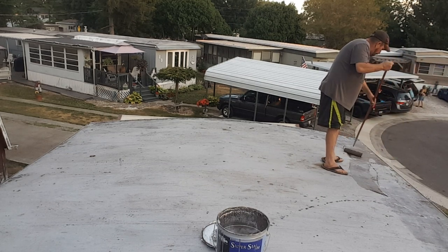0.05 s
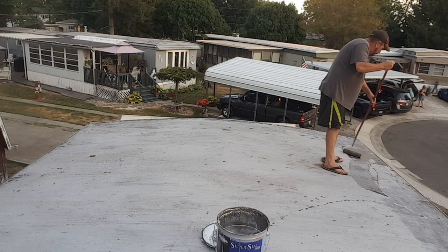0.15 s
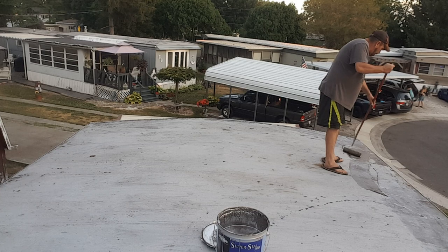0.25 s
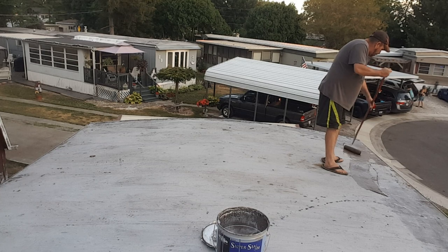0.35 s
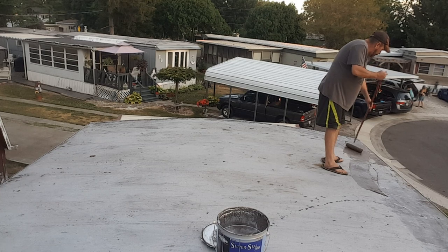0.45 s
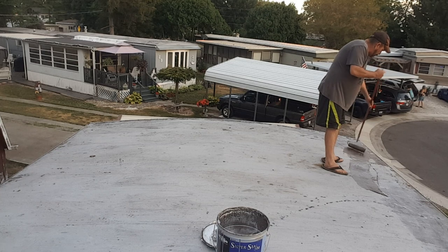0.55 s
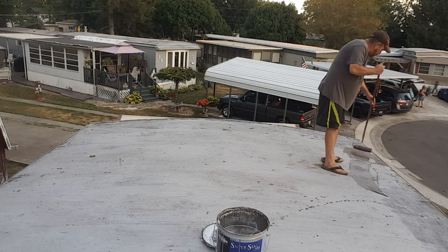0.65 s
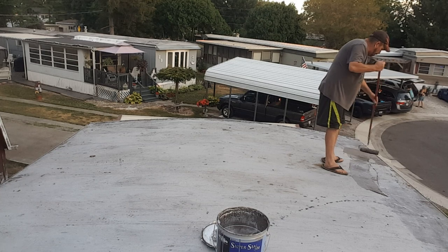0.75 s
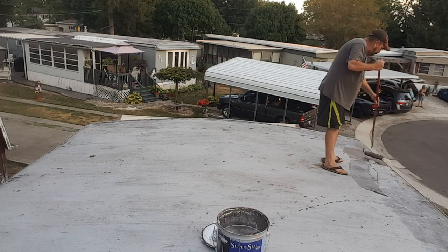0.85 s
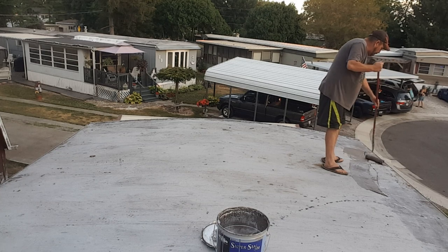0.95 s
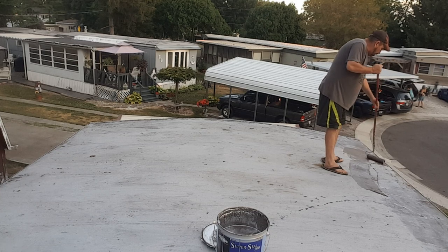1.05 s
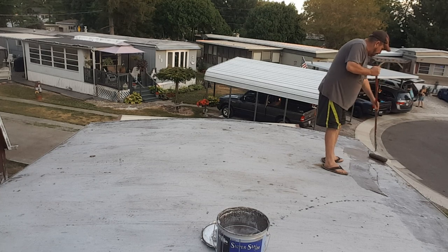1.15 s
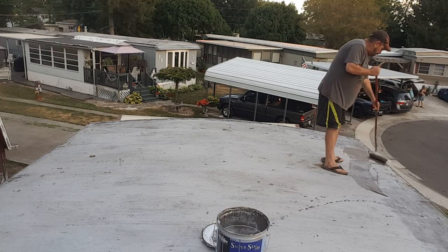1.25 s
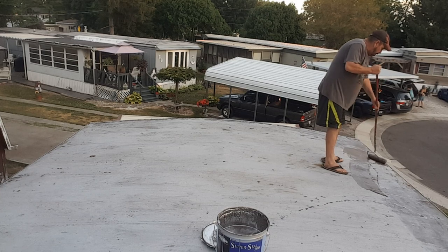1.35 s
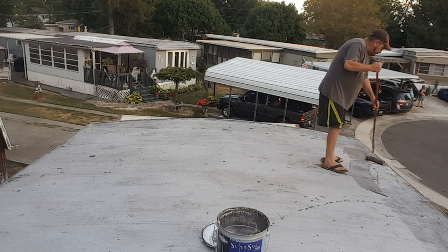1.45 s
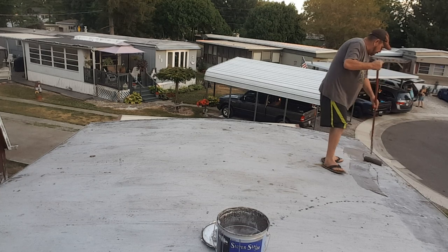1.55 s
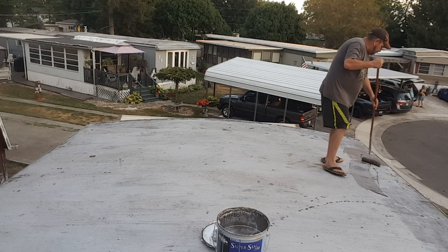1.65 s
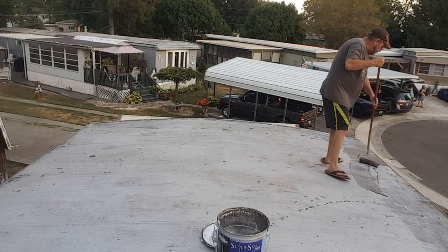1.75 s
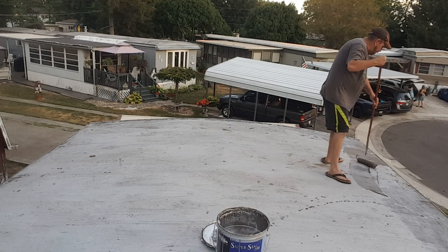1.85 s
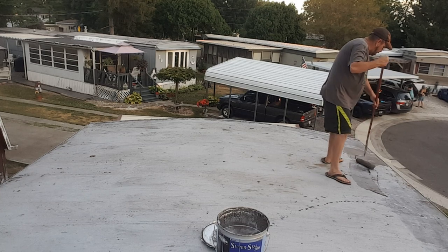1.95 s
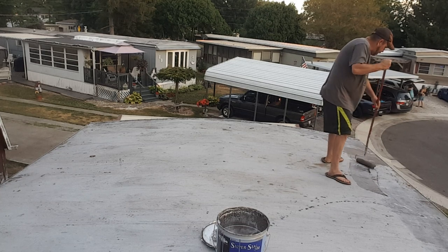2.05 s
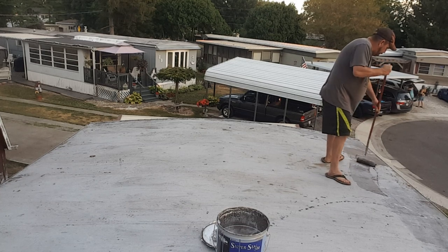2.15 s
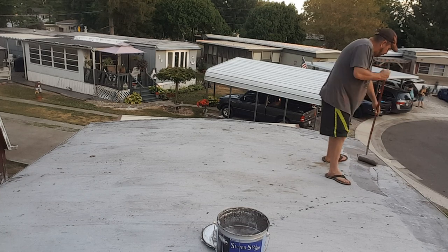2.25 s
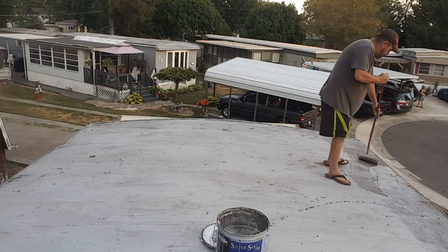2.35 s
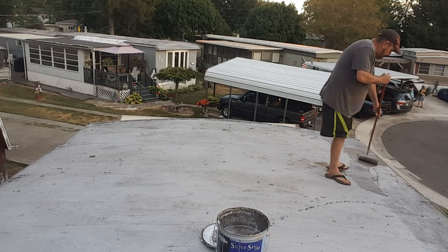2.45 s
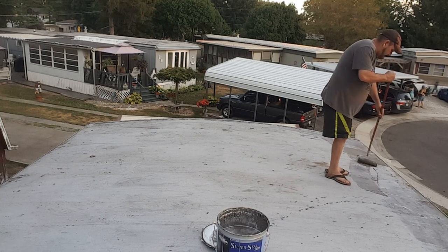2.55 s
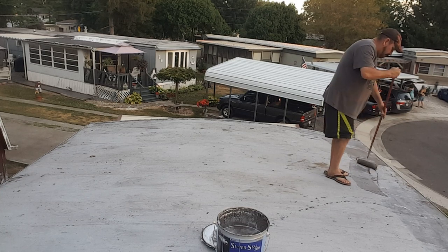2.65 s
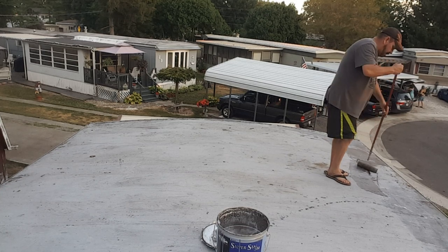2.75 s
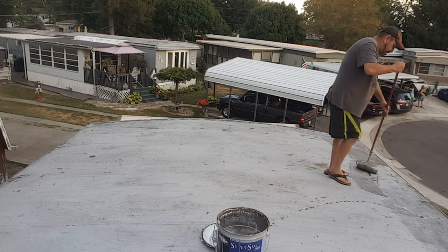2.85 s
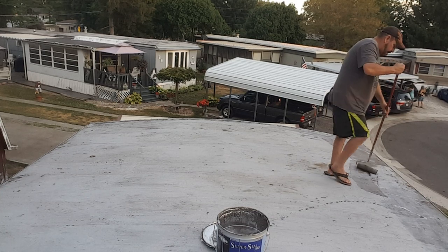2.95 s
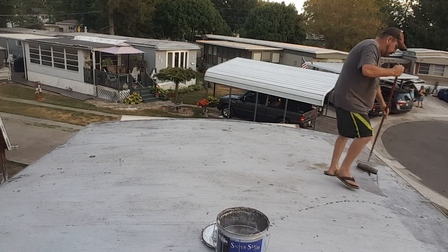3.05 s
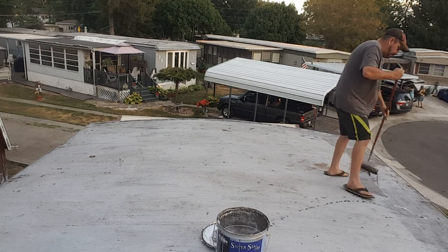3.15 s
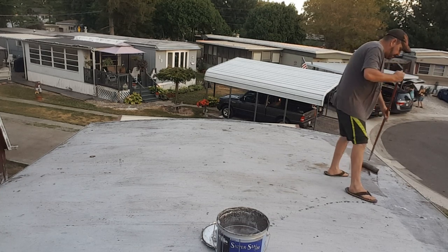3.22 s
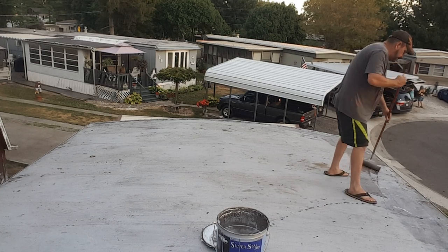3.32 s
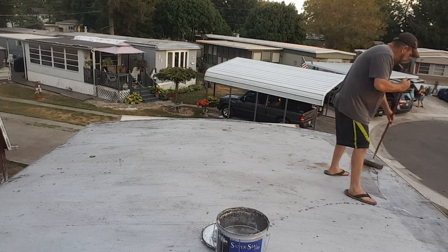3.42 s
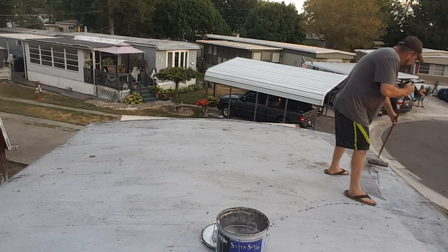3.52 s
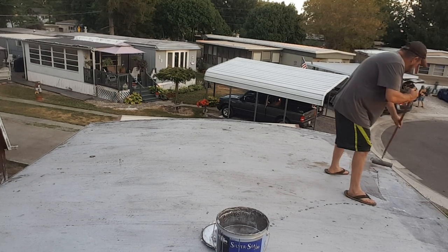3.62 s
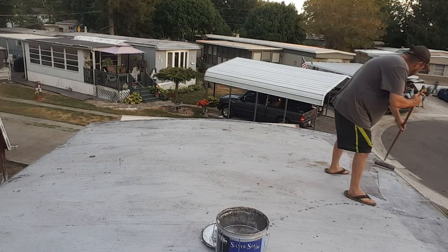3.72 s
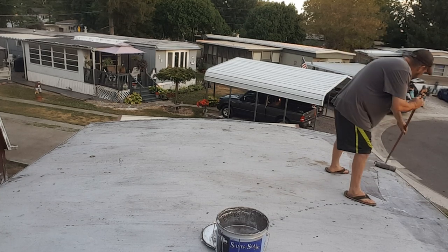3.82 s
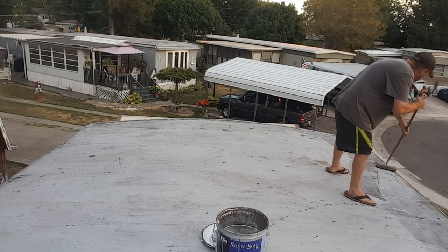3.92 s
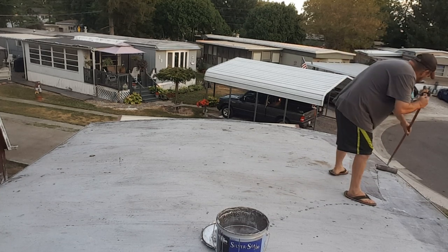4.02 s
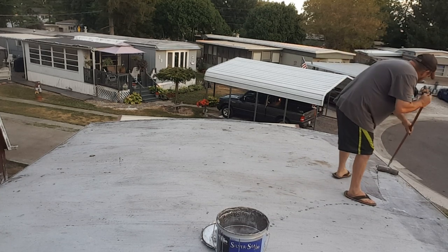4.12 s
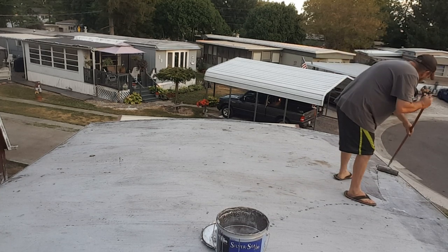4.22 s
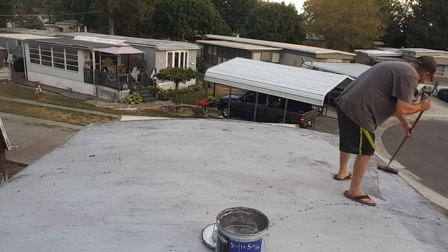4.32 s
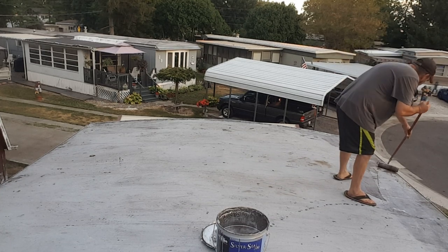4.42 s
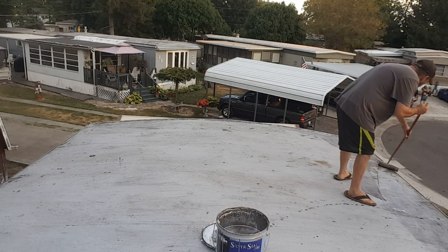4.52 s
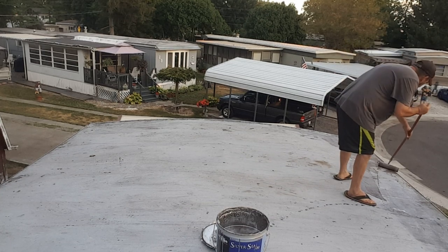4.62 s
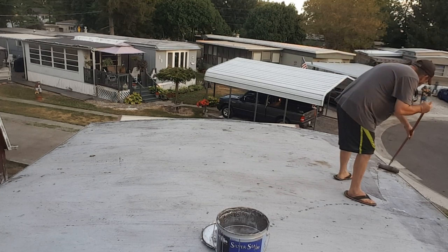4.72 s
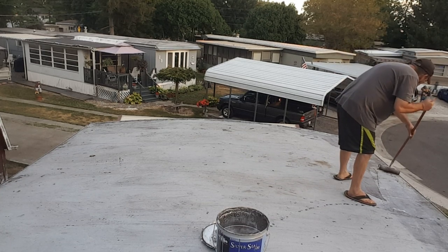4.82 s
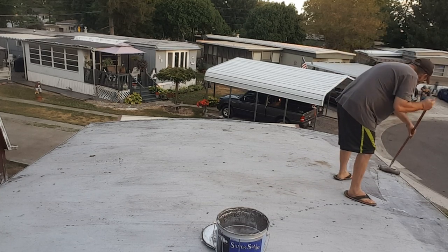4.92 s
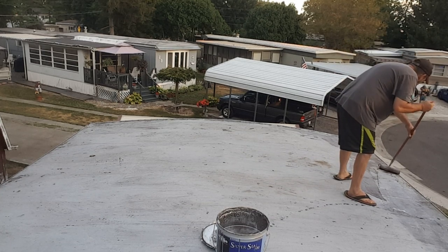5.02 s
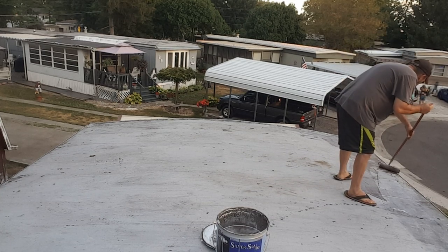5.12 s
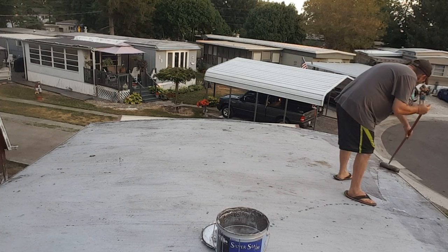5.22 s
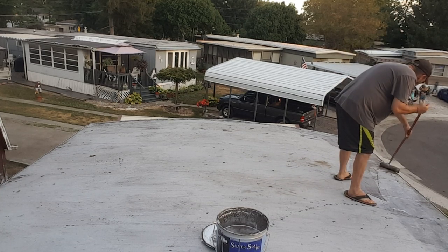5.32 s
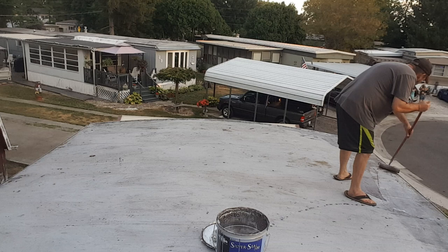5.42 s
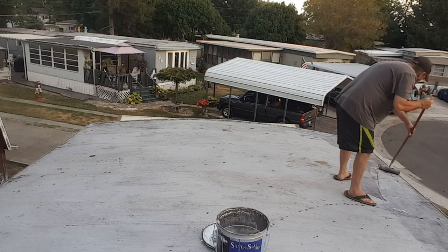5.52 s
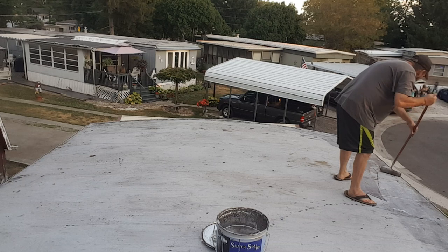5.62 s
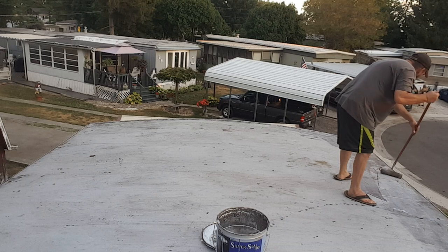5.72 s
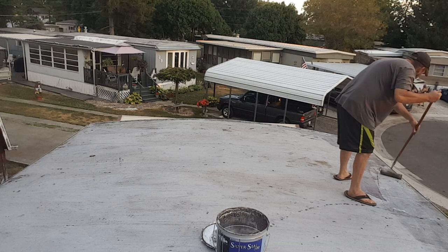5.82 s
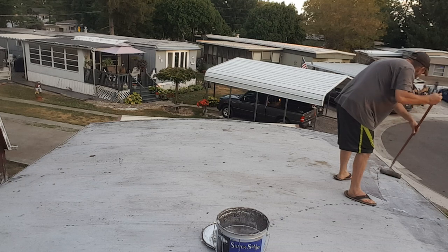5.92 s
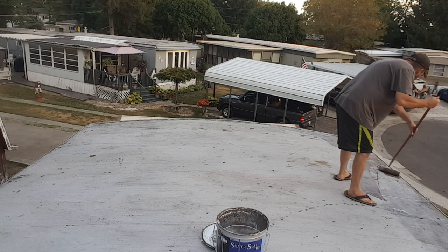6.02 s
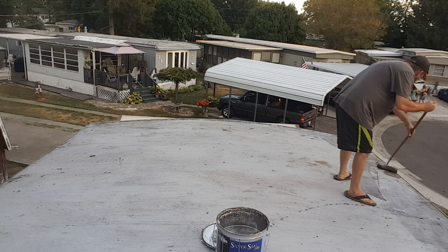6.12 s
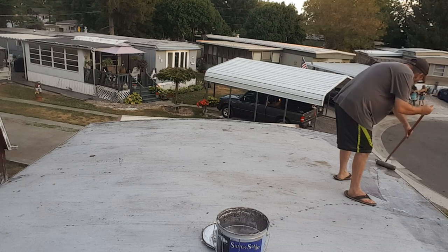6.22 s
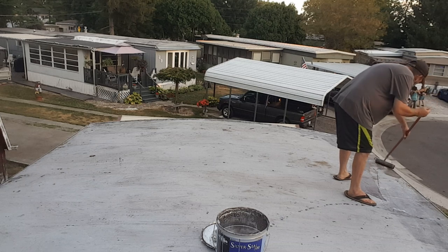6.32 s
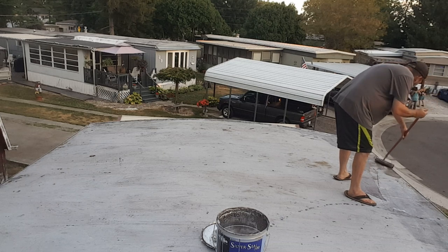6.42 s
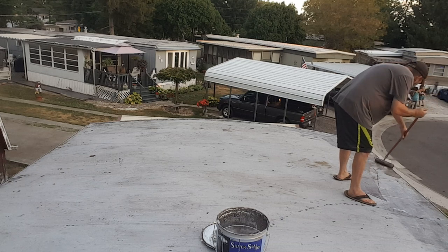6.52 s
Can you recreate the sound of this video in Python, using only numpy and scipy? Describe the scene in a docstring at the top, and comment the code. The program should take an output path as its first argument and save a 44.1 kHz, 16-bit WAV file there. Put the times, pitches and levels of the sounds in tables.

```python
"""On a hollow sheet-metal roof over a quiet street, a few metres off, a man in sandals rolls on coating.
The panels buckle under his feet and the roller: each load sets off a run of snaps that rings the sheet,
loudest as he steps sideways. In between, the roller and his shifting weight keep up a soft rumble.
Sandals and the wet roller swish and peel softly; far traffic and a machine hum lie behind."""
import sys
import numpy as np
from scipy import signal
from scipy.fft import rfft, irfft, next_fast_len
from scipy.io import wavfile
from scipy.ndimage import uniform_filter1d, map_coordinates

SR = 44100
rng = np.random.default_rng(int(sys.argv[2]) if len(sys.argv) > 2 else 0)


def to_wav(s):
    """Save 16-bit WAV."""
    ch = np.atleast_2d(s).T  # columns
    pcm = np.round(np.clip(ch, -1, 1) * 32767)  # PCM
    wavfile.write(sys.argv[1], SR, pcm.astype(np.int16))


N = 289737


def amp(db):
    """Decibels to gain."""
    return 10 ** (np.asarray(db) / 20)


def unit(x):
    """x at rms 1."""
    return x / np.sqrt(np.mean(x ** 2) + 1e-20)


def along(points, hz):
    """Read a curve of (frequency, value) points on a log frequency axis."""
    f, v = np.transpose(points)
    return np.interp(np.log(hz + 1), np.log(f + 1), v)


def wobble(rate):
    """A smooth random modulator, rate knots a second."""
    knots = rng.standard_normal(int(N * rate / SR) + 4)
    return map_coordinates(knots, [np.arange(N) * rate / SR])


def filtered(x, response):
    """EQ x with a complex response, a function of frequency."""
    size = x.shape[-1]
    padded = next_fast_len(size + SR // 10)
    spectrum = rfft(x, padded) * response(np.fft.rfftfreq(padded, 1 / SR))
    return irfft(spectrum, padded)[..., :size]


def minimum_phase(gain):
    """A response with this gain and no pre-ring: nothing sounds before the blow."""
    cepstrum = irfft(np.log(np.maximum(gain, 1e-6)))
    half = len(cepstrum) // 2
    cepstrum[1:half] *= 2
    cepstrum[half + 1:] = 0
    return np.exp(rfft(cepstrum))


def noise_pair(correlation, size):
    """Stereo white noise whose width follows a curve of left-right correlation."""
    def mid_side_gains(hz):
        angle = np.arccos(np.clip(along(correlation, hz), -1, 1)) / 2
        return np.array([np.cos(angle), np.sin(angle)])
    mid, side = filtered(rng.standard_normal((2, size)), mid_side_gains)
    return np.array([mid + side, mid - side])


def add(track, s, sound):
    """Mix a sound into the track at s seconds."""
    part = track[:, round(s * SR):][:, :sound.shape[-1]]
    part += sound[..., :part.shape[-1]]


# EQ of the street bed: f/Hz, relative level/dB
STREET_EQ = [(15, -22.5), (25, -22), (93, -3), (150, -7.5), (220, -7.5), (340, -11.5), (430, -11.5),
             (950, -12.5), (1300, -18), (2000, -21.5), (3200, -27.5), (5000, -34.5), (8500, -38.5),
             (15500, -44)]
# stereo image of the bed: f/Hz, left-right correlation
STREET_IMAGE = [(60, 0.98), (130, 0.9), (290, 0.8), (640, 0.026), (1410, -0.85), (3100, 0.15),
                (6800, -0.11)]
# partials of the far machine: f/Hz, level/dB before the trim
HUM_PARTIALS = [(990.5, -69.5), (1884, -80), (2099, -81), (9680, -102.5)]

def street(bed_db=-52, hum_trim_db=1.0, drift_hz=3.54):
    """A bed of far traffic and air, with the slightly unsteady tones of a distant machine."""
    air = unit(filtered(noise_pair(STREET_IMAGE, N), lambda hz: amp(along(STREET_EQ, hz))))
    out = air * amp(bed_db + 0.25 * wobble(2.89))
    for hz, db in HUM_PARTIALS:
        phase = 2 * np.pi * np.cumsum(hz + drift_hz * wobble(30)) / SR
        out += np.sqrt(2) * amp(db + hum_trim_db + 1.6 * wobble(22)) * np.sin(phase)
    return out


# stereo image of the roof: f/Hz, left-right correlation
ROOF_IMAGE = [(125, 1), (250, 0.98), (500, 1), (1000, 0.66), (2000, 0.38), (6000, 0.39)]

def roof_noise(size):
    """Raw noise for the roof's sounds: near mono in the lows, wider on top."""
    return noise_pair(ROOF_IMAGE, size)


# pan of the roof: f/Hz, left minus right level/dB
ROOF_BALANCE = [(100, 0.1), (400, 0.5), (700, 1.4), (1300, 3.5), (2400, 3), (4400, 1.5)]

def from_roof(x, lead_s):
    """The work reaches the left side sooner and a little louder."""
    sides = np.array([[.5], [-.5]])
    pan = lambda hz: amp(sides * along(ROOF_BALANCE, hz))
    return filtered(x, lambda hz: pan(hz) * np.exp(2j * np.pi * hz * lead_s * sides))


# strokes over the wet coating: start t/s, end t/s, start level/dB, end level/dB
STROKES = [(0.0, 0.56, -67, -74), (1.46, 1.605, -66, -68), (1.602, 1.64, -56, -55.5),
           (1.772, 1.88, -49.5, -57), (2.234, 2.374, -70.5, -63), (2.585, 2.64, -69, -62),
           (2.996, 3.046, -63, -62), (3.97, 4.258, -61, -55)]
# EQ of the swish: f/Hz, relative level/dB
SWISH_EQ = [(500, -18), (1300, 6), (2600, 2), (4200, -5), (6000, -4), (8500, 0), (10200, -12.5),
            (15000, -10)]

def wet_swish(fade_s=.026, rolling_db=-77.5):
    """A grainy swish while roller nap or a sole slides, over the faint swells of steady rolling."""
    t = np.arange(N) / SR
    strokes = np.zeros(N)
    for start, end, start_db, end_db in STROKES:
        gate = np.clip(np.minimum(t - start, end - t) / fade_s + .5, 0, 1)
        strokes += gate * amp(np.interp(t, [start, end], [start_db, end_db]))
    rolling = amp(rolling_db + 2.6 * wobble(5.8))
    hiss = unit(filtered(roof_noise(N), lambda hz: amp(along(SWISH_EQ, hz))))
    grain = amp(1.3 * wobble(40) + 1.7 * wobble(600))
    return hiss * np.hypot(strokes, rolling) * grain


# tacky lift-offs: t/s, level/dB, centre f/Hz
LIFT_OFFS = [(3.247, -57.5, 4360), (3.312, -66, 7900), (3.36, -65.5, 8800), (3.819, -58, 5220),
             (3.862, -64, 8150), (4.735, -68, 10000)]

def peels(width_octaves=0.36, half_length_s=0.0073):
    """Short sticky hisses as rubber or roller nap lets go of the coating."""
    out = np.zeros((2, N))
    t = np.arange(SR // 3) / SR - 1 / 6
    envelope = np.exp(-(t / half_length_s) ** 2)
    for s, db, centre_hz in LIFT_OFFS:
        band = lambda hz: np.exp(-.5 * (np.log2((hz + 1) / centre_hz) / width_octaves) ** 2)
        hiss = unit(filtered(roof_noise(len(t)), band))
        add(out, s + t[0], amp(db) * hiss * envelope)
    return out


# EQ of the rumble: f/Hz, relative level/dB
RUMBLE_EQ = [(30, -17.5), (60, -14.5), (95, 4), (140, -4.5), (210, -1), (330, -11), (600, -13.5),
             (1500, -26), (4000, -56)]
# fader ride as weight shifts on the roof: t/s, level/dB before the trim
WEIGHT_RIDE = [(0.0, -53), (0.91, -68), (1.17, -54), (2.3, -46), (2.49, -50.5), (3.33, -45), (3.5, -35.5),
               (3.84, -34), (4.04, -45.5), (4.32, -53), (6.29, -53), (6.57, -48)]

def roof_rumble(trim_db=-3.5, swing_db=2.5):
    """The roller and shifting weight keep the roof rumbling unevenly."""
    s, db = np.transpose(WEIGHT_RIDE)
    ride_db = np.interp(np.arange(N) / SR, s, db)
    rumble = unit(filtered(roof_noise(N), lambda hz: amp(along(RUMBLE_EQ, hz))))
    return rumble * amp(ride_db + trim_db + swing_db * wobble(15))


def snaps(start_s, length_s, size, count=10, fade_db=1.5):
    """A run of uneven force impulses that tend to weaken as it goes, with energy 1."""
    progress = (np.arange(count) + rng.random(count)) / count
    force = rng.choice([-1, 1], count) * amp(rng.normal(0, 3.0, count) - fade_db * progress)
    onsets = ((start_s + progress * length_s) * SR).astype(int)
    return np.bincount(onsets, force / np.linalg.norm(force), size)


CREAK_ROOM_S = .03  # silent room kept before the first snap, so that the short creak fits

def buckling(run_s, size, creak_db=-11, run_hz=2600, settle_s=.07, settle_db=-18.5, settle_hz=450):
    """Force spectra of a panel giving way: a creak and sharp snap, a run of duller snaps, soft settling."""
    hz = np.fft.rfftfreq(size, 1 / SR)
    lowpass = lambda cutoff_hz: 1 / (1 + 1j * hz / cutoff_hz) ** 2
    creak_s = np.clip(.17 * run_s, 0, CREAK_ROOM_S)
    attack = amp(creak_db) * snaps(CREAK_ROOM_S - creak_s, creak_s, size, count=4)
    attack[round(CREAK_ROOM_S * SR)] += np.sqrt(0.013 / run_s)  # first snap: energy of 13 ms of the run
    run = snaps(CREAK_ROOM_S, run_s, size)
    settle_gain = amp(settle_db) * np.linalg.norm(attack + run)
    settling = settle_gain * snaps(CREAK_ROOM_S + run_s, settle_s, size)
    return rfft(attack), rfft(run) * lowpass(run_hz), rfft(settling) * lowpass(settle_hz)


# decay of the struck panel: f/Hz, t60/s
PANEL_DECAY = [(100, 0.18), (500, 0.076), (1500, 0.061), (5000, 0.1)]

def sheet_ring(size, direct=0.75, tail_db=-11, tail_stretch=4.65, spread_cycles=0.84):
    """One snap heard directly, then as bending waves that cross the panel and die slowly in the roof."""
    hz, t, cells = signal.stft(roof_noise(size), SR, nperseg=128)
    t60 = along(PANEL_DECAY, hz)[:, None]
    decay = amp(-60 * t / t60) + amp(tail_db - 60 * t / (tail_stretch * t60))
    arrival = 1 - np.exp(-t * (hz[:, None] + 100) / spread_cycles)  # low bending waves travel slowest
    envelope = decay * arrival
    envelope /= np.linalg.norm(envelope, axis=1, keepdims=True)
    ring = signal.istft(cells * envelope, SR, nperseg=128)[1][:, :size]
    ring /= np.linalg.norm(ring[0])
    ring[:, 0] += direct
    return ring


# broad EQ of the roof: f/Hz, relative level/dB
BODY_EQ = [(25, -36), (50, -15), (90, 3), (150, 0), (300, -2), (750, -6), (1000, -9.5), (1600, -11),
           (2600, -19), (4200, -25.5), (7000, -38.5), (12000, -44)]
# resonances of the roof: f/Hz, width/Hz, boost/dB on the broad EQ
RESONANCES = [(151.8, 34, 4), (187, 50, 3.5), (317, 12, 2), (460, 22, 0.5), (614, 180, 2.5), (710, 58, 1),
              (790, 23, -1), (880, 60, -0.5), (1120, 25, -2.5), (1390, 90, 0), (1480, 41, -1.5),
              (1767, 50, -2.5), (1940, 14, -2.5), (2280, 18, 4.5)]
# a foot or the roller loads a panel until it gives: t/s, level/dB, cutoff f/Hz, bass shelf/dB, run length/s
PANEL_HITS = [(0.173, -41.5, 350, 14, 0.027), (1.014, -30, 1430, 2, .016), (1.200, -44, 403, 21, 0.072),
              (1.405, -28.5, 2100, -4.5, 0.0036), (1.506, -35, 400, 15.5, 0.076), (1.614, -33, 230, 5, .01),
              (1.958, -29, 790, 11.5, 0.019), (2.097, -40, 1000, -4, .033), (2.238, -25.5, 455, 0.5, 0.077),
              (2.257, -27.5, 1370, 0.5, 0.00306), (2.591, -39, 2400, 12, 0.0019),
              (2.675, -27, 900, 8.5, 0.046), (2.870, -44, 400, -6, .003), (2.929, -37.5, 278, -5, 0.039),
              (3.017, -38, 650, 3, 0.03), (3.285, -34.5, 180, -3, 0.029), (3.327, -18.5, 1410, 3.5, 0.013),
              (3.396, -22, 1120, 10, 0.04), (3.486, -11.5, 2540, -2, 0.044),
              (3.565, -24, 1710, -10.5, .025), (3.624, -16, 1880, -13, .022), (3.729, -28.5, 740, 2, 0.027),
              (3.840, -14.5, 1550, 2, .056), (4.035, -38, 300, 5, .004), (4.294, -41.5, 320, -0.5, 0.0023),
              (4.875, -26.5, 1450, 1.5, 0.021), (5.155, -45.5, 500, 17, 0.065),
              (6.192, -45, 700, 4, 0.0033), (6.409, -39.5, 120, 7, .03), (6.47, -35.5, 580, -5.5, 0.028)]

def panel_knocks(travel_s=0.000962, size=20480):
    """Each buckling rings the roof from another spot, as a dull thud, a boom or a bright knock."""
    out = np.zeros((2, N))
    hz = np.fft.rfftfreq(size, 1 / SR)
    resonance_db = sum(db / (1 + (2 * (hz - f) / width) ** 2) for f, width, db in RESONANCES)
    body = amp(along(BODY_EQ, hz) + resonance_db)
    # bending waves need travel_s at 1 kHz and longer below, so each snap falls in pitch
    dispersion = np.exp(-4j * np.pi * travel_s * np.sqrt(1000 * hz))
    for s, db, cutoff_hz, bass_db, run_s in PANEL_HITS:
        motion = dispersion * sum(force * rfft(sheet_ring(size)) for force in buckling(run_s, size))
        # the spot decides the fine peaks and notches; body and contact replace the broad colour
        power = np.mean(np.abs(motion) ** 2, axis=0)
        broad_colour = np.sqrt(np.abs(uniform_filter1d(power, size=120)))
        bass_shelf = amp(bass_db / (1 + (hz / 200) ** 2))
        contact = bass_shelf / np.sqrt(1 + (hz / cutoff_hz) ** 4)
        contact /= np.sqrt(1 + (hz / (2.4 * cutoff_hz)) ** 4)  # rubber and nap swallow the top
        knock = irfft(motion * minimum_phase(body * contact / broad_colour))
        knock /= np.sqrt(np.sum(knock ** 2) / (0.041 * SR))  # the energy of 41 ms at rms 1
        add(out, s - CREAK_ROOM_S, amp(db) * knock)
    return out


def scene():
    """The mix: the work on the roof up front and a little left, the street behind."""
    panels = from_roof(panel_knocks() + roof_rumble(), lead_s=0.00017)
    surface = from_roof(wet_swish() + peels(), lead_s=0.00014)
    return panels + surface + street()


def record(dry):
    """A brick-wall low-pass on the mix."""
    return filtered(dry, lambda hz: hz < 15740)


dry = scene()
out = record(dry)
to_wav(out)
```